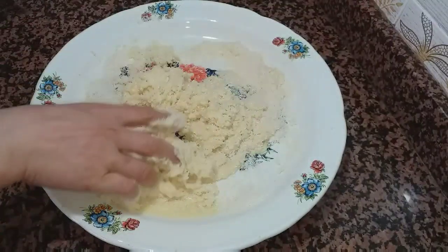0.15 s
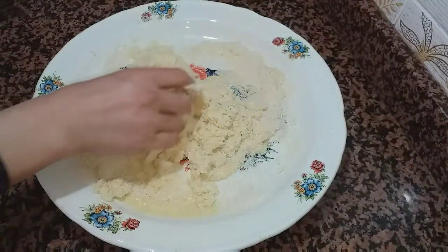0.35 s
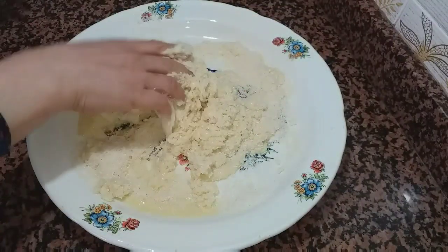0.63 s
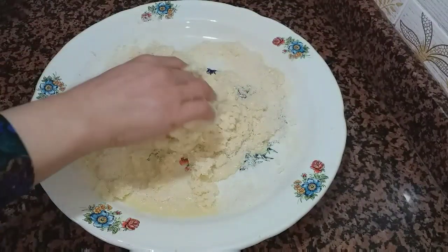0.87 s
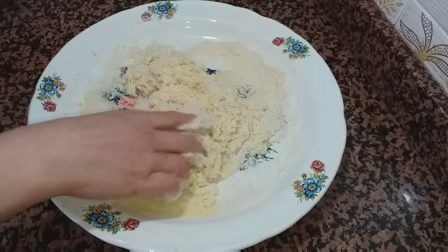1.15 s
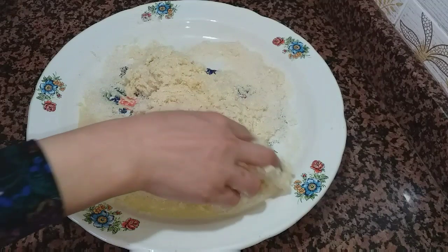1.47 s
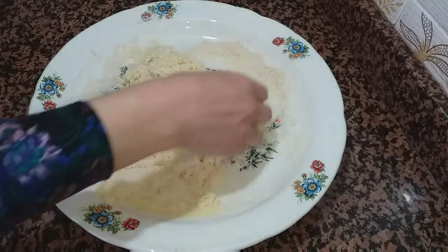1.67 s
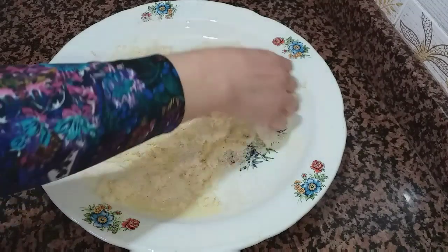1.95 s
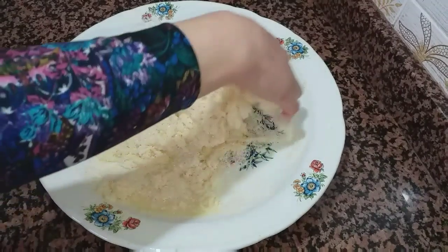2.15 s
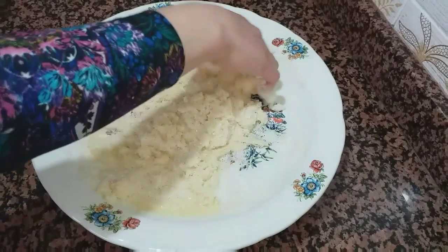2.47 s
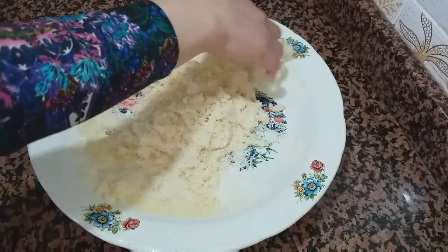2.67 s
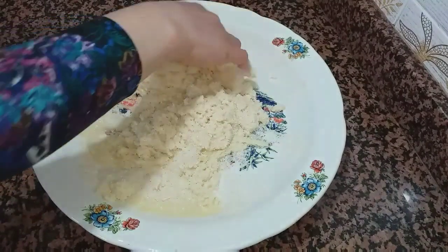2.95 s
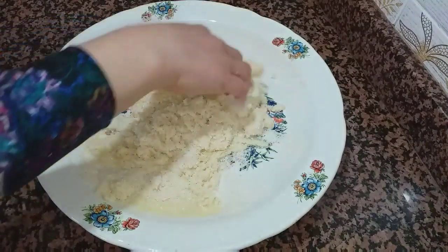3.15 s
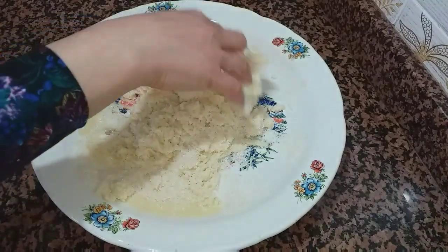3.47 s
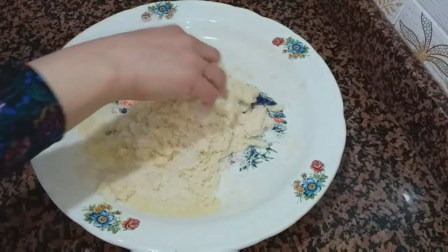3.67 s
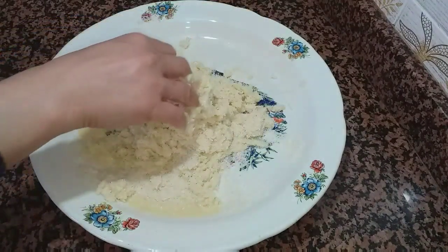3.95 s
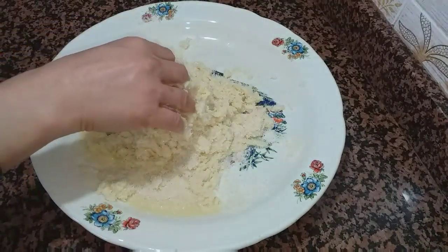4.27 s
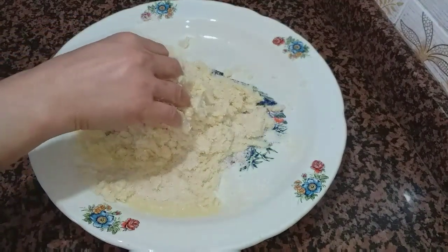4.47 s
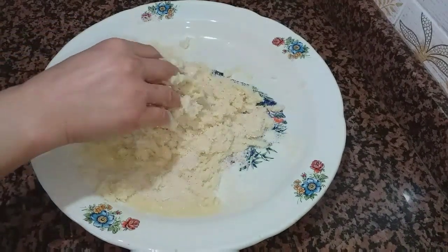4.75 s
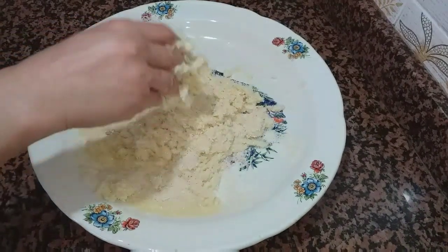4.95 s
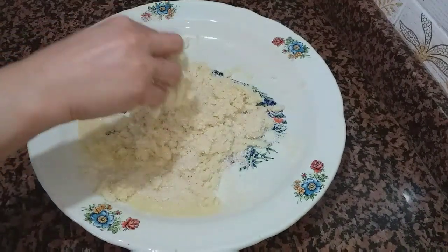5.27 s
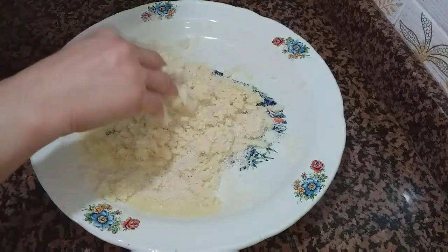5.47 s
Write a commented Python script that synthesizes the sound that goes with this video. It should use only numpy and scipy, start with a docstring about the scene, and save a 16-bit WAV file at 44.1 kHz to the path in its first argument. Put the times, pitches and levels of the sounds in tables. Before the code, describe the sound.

A hand rubs crumbly dough on a ceramic plate in soft hissing strokes, then two hard thumps knock the counter in a quiet kitchen.

```python
"""A hand rubs a crumbly mixture across a ceramic plate in slow strokes, in a quiet hard-walled kitchen.
Random crumb clicks make the hiss and ring the plate's resonances; low-ringing noise makes hollow swells.
Uneven slips make the plate drag on the counter, short pushes make it thump, and noise bursts make ticks.
Two faint creaks are pairs of sines. Noise following the stored sound energy makes the kitchen's echo.
A motor hums as wavering sines over the room's rumble of coloured noise."""
import sys
import numpy as np
from scipy import signal
from scipy.fft import rfft, irfft, next_fast_len
from scipy.io import wavfile
from scipy.ndimage import uniform_filter1d

SR = 44100
rng = np.random.default_rng(int(sys.argv[2]) if len(sys.argv) > 2 else 0)


def output_pcm(signal):
    """Save a mono or channel-first signal as 16-bit PCM at the path in sys.argv[1].

    Samples are clipped to [-1, 1] before scaling.
    """
    pcm = np.clip(np.atleast_2d(signal).T, -1, 1) * 32767
    wavfile.write(sys.argv[1], SR, np.round(pcm).astype(np.int16))


def field_ratio(decibels):
    """Amplitude ratio for a level in dB (20 dB per decade); scalars and array-likes work."""
    return 10 ** (np.asarray(decibels, dtype=float) / 20)


N = 247907   # length in samples

# Colour of the crumbs' broad hiss. Each row: frequency in Hz, relative level in dB per Hz.
CRUMB_HISS = [(3000, 3.5), (3600, 1.5), (5500, -1.5), (8200, -5), (9000, -19)]
# Colour of the finest, highest hiss. Each row: frequency in Hz, relative level in dB per Hz.
FINE_HISS = [(5060, -3), (8600, -6.5), (9840, -8.5), (11100, -6), (13400, -8), (16000, -14.5)]
# Resonances of the plate. Each row: frequency in Hz, width of one filter pass in Hz, relative level in dB.
PLATE = [(1495, 360, 3.5), (1852, 155, -3), (2117, 650, 9), (2717, 280, -2.5), (3340, 320, -7),
         (3800, 700, 0.5), (4140, 1800, 0), (5980, 190, -0.5), (7000, 100, -3), (8000, 420, 4.5)]
# Ways the counter can ring (its modes). Each row: frequency in Hz, relative level in dB,
# time to die away by 60 dB in seconds.
COUNTER = [(80.6, -3.5, 0.25), (100, -1.5, 0.58), (138.4, -2.5, 0.23), (179.1, 0, 0.25),
           (215.2, 6.5, 0.095), (301, 2, 0.11), (362, 6.5, 0.055), (421.5, 5.5, 0.04), (544.5, 4.5, 0.046),
           (672, -5.5, 0.12), (856, -9, 0.12), (960, -34, 0.11)]
# Shape of hollow swells and drags: dB under the top at the start, the same at the end,
# then slope in dB per second before the start and after the end.
SWELL = (13, 15.5, 240, 110)


def rms_one(x):
    """Scale to unit rms (average strength 1)."""
    return x / np.sqrt(np.mean(x ** 2) + 1e-20)


def at_hz(points, hz):
    """Read a table of (Hz, value) on a log-frequency axis."""
    table_hz, values = np.array(points)[:, 0], np.array(points)[:, 1]
    return np.interp(np.log(hz + 1), np.log(table_hz), values)


def coloured(x, spectrum):
    """Give x the spectrum, falling 60 dB per octave outside its ends; rms 1."""
    size = next_fast_len(len(x))
    hz = np.arange(size // 2 + 1) * SR / size
    octaves_below = np.maximum(np.log2(spectrum[0][0] / (hz + 1)), 0)
    octaves_above = np.maximum(np.log2((hz + 1) / spectrum[-1][0]), 0)
    gain = field_ratio(at_hz(spectrum, hz) - 60 * (octaves_below + octaves_above))
    return rms_one(irfft(rfft(x, size) * gain, size)[:len(x)])


def resonant(x, peaks):
    """Resonances side by side, each applied twice for dark valleys between them; rms 1."""
    out = 0
    for hz, width, level_db in peaks:
        r = np.exp(-np.pi * width / SR)   # share of the ringing kept per sample
        b = np.array([1, 0, -1]) * (1 - r * r) / 2
        a = [1, -2 * r * np.cos(2 * np.pi * hz / SR), r * r]
        once = signal.lfilter(b, a, x)
        out = out + field_ratio(level_db) * signal.lfilter(b, a, once)
    return rms_one(out)


def drift(rate):
    """Slow random wandering of rms 1: noise smoothed twice at the given rate in Hz."""
    r = np.exp(-2 * np.pi * rate / SR)
    noise = rng.standard_normal(N + SR)
    return rms_one(signal.lfilter([1], [1, -2 * r, r * r], noise)[SR:])   # skip the first second


def swells(rows, start_db, end_db, in_db_per_s, out_db_per_s, lag_s=0):
    """Level in dB of each (s, rise s, fall s): 0 on top, straight slopes to start and end, others beyond."""
    s, rise, fall = np.array(rows).T[:3, :, None]
    since = np.arange(N) / SR - s - lag_s
    early = since < 0
    length = np.maximum(np.where(early, rise, fall), .005)
    beyond = np.maximum(np.abs(since) - length, 0)
    drop_db = np.where(early, start_db, end_db) * np.minimum(np.abs(since) / length, 1)
    return -drop_db - np.where(early, in_db_per_s, out_db_per_s) * beyond


def grains(per_s, spread_db, clump_db):
    """Clicks of crumbs breaking at random moments, their sizes varied one by one and in clumps; rms 1."""
    born = rng.random(N) < per_s / SR
    single_db = spread_db * np.minimum(rng.exponential(1, N), 4)
    sizes = field_ratio(single_db + clump_db * drift(27))
    return rms_one(born * sizes * rng.choice([-1, 1], N))


def damped_rings(crumbs, peaks, wander_db):
    """The hand and the heap damp each resonance differently from moment to moment; rms 1."""
    out = 0
    for peak in peaks:
        level = field_ratio(peak[2] + wander_db * drift(2.03))
        out = out + level * resonant(crumbs, [peak])
    return rms_one(out)


def patchy(x, patchy_db, rate):
    """Broad overlapping bands swell and fade on their own as the crumbs under the hand change; rms 1."""
    size = next_fast_len(N)
    octaves = np.log2((np.arange(size // 2 + 1) + 1) * SR / size / 2400)   # above 2400 Hz
    out = 0
    for k in range(8):
        share = np.clip(1 - np.abs(3 * octaves - k), 0, 1)   # bands a third of an octave apart
        band = irfft(rfft(x, size) * share, size)[:N]
        out = out + field_ratio(patchy_db * drift(rate)) * band
    return rms_one(out)


def rubbing():
    """One stream of crumbs feeds the broad hiss, the finest top and the plate's rings."""
    # Strokes of the hand. Each row: hardest press in seconds, build-up in seconds, easing in seconds,
    # hiss level in dB, then over the hiss in dB: low plate rings, upper plate rings, finest top.
    strokes = [(0.0, .1, 0.13, -74.5, -7, -20, -1.5), (0.339, 0.14, 0.22, -61, -5.5, -9.5, -13.5),
               (.84, 0.12, 0.12, -63.5, -2.5, -11, -11), (1.18, .04, 0.11, -64.5, -9, -23, -11.5),
               (1.309, 0.095, .2, -61.5, -7, -10, -9), (1.61, 0.049, .15, -65.5, -6.5, -10, 1),
               (1.675, 0.033, 0.049, -54.5, -6, -10, -15), (1.95, 0.051, 0.1, -69.5, -8, -2, 1),
               (2.068, .07, 0.1, -60.5, -4, -6, -6), (2.36, 0.093, 0.17, -69.5, -6, -1, -0.5),
               (2.512, 0.082, 0.08, -57, -8.5, -11, -11.5), (2.94, 0.17, .17, -64, -9, -17, -5),
               (3.309, 0.13, 0.13, -64.5, -10.5, -21, -6.5), (3.722, 0.093, .14, -67, -11, -25, -2),
               (3.96, 0.036, 0.047, -77.5, -20, -24, -14), (4.371, 0.047, 0.076, -60.5, -8.5, -4.5, -8),
               (5.21, 0.067, 0.052, -65, -3, -14, 1), (5.3, 0.17, .35, -65.5, -2, -16, -18)]
    # Shape of a press: dB under its top at touch-down, the same at lift,
    # then slope in dB per second before touch-down and after lift.
    press_shape = (9.6, 10, 660, 164)
    ring_growth, ring_lag_s = 1.22, 0.012   # rings grow faster than the hiss, a little later
    hiss_db, low_db, upper_db, top_db = np.array(strokes).T[3:]
    press = field_ratio(swells(strokes, *press_shape))
    ringing = field_ratio(ring_growth * swells(strokes, *press_shape, ring_lag_s))
    crumbs = grains(per_s=12000.0, spread_db=0.0, clump_db=0.83)

    low_rings = field_ratio(hiss_db + low_db) @ ringing * damped_rings(crumbs, PLATE[:3], wander_db=1.5)
    upper_rings = field_ratio(hiss_db + upper_db) @ ringing * damped_rings(crumbs, PLATE[3:5], wander_db=3.0)
    hiss = coloured(crumbs, CRUMB_HISS) + field_ratio(-13.5) * resonant(crumbs, PLATE[5:])
    hiss = patchy(hiss, patchy_db=2.5, rate=9.4)
    fine_top = field_ratio(hiss_db + top_db) @ press * coloured(crumbs, FINE_HISS)
    return field_ratio(hiss_db) @ press * hiss + low_rings + upper_rings + fine_top


def hollow():
    """Hollow swells in mid stroke: noise in a few low resonances."""
    # Each row: top of the swell in seconds, rise in seconds, fall in seconds, level in dB.
    hollow_swells = [(2.076, 0.11, 0.15, -59), (3.07, 0.13, 0.35, -75)]
    # Each row: frequency in Hz, width of one filter pass in Hz, relative level in dB.
    hollow_ring = [(745, 180, -5), (941, 79, 0.5), (1080, 180, -6)]
    level = field_ratio(np.array(hollow_swells)[:, 3]) @ field_ratio(swells(hollow_swells, *SWELL))
    return level * resonant(rng.standard_normal(N), hollow_ring)


def bursts(rows, spectrum):
    """Noise bursts of (s, dB, t60 s) that swell quickly and die away by 60 dB in their t60."""
    envelope, t = np.zeros(N), np.arange(N) / SR
    for s, level_db, t60 in rows:
        since = np.maximum(t - s, 0)
        rise_s = min(0.02 * t60, 0.0053)   # a share of the t60, up to a longest rise
        envelope += field_ratio(level_db - 60 * since / t60) * (1 - np.exp(-since / rise_s))
    return envelope * coloured(rng.standard_normal(N), spectrum)


def snaps():
    """Crumbs snapping: single dry ticks of noise, each with a fine top."""
    # Each row: start in seconds, level in dB, time to die away by 60 dB in seconds,
    # finest top in dB over the level.
    ticks = [(.2645, -56, 0.0074, -12), (0.2784, -46, 0.0086, -11), (4.367, -49, 0.011, -10),
             (4.766, -55.5, 0.14, -12), (5.11, -62, .2, 3), (5.158, -72.5, .015, -1),
             (5.19, -52, 0.046, 4.5)]
    broad = bursts([row[:3] for row in ticks], CRUMB_HISS)
    fine = bursts([(s, level_db + top_db, t60) for s, level_db, t60, top_db in ticks], FINE_HISS)
    return broad + fine


def near(hz, centre_hz, fall_db):
    """Gain that falls in dB with the square of the distance in octaves from a centre."""
    return field_ratio(-fall_db * np.log2(hz / np.maximum(centre_hz, 40)) ** 2)


def counter(forces):
    """Each mode of the counter rings from its own force signal."""
    out = 0
    for force, (hz, level_db, t60) in zip(forces, COUNTER):
        r = field_ratio(-60 / (max(t60, .01) * SR))   # share of the ringing kept per sample
        w = 2 * np.pi * hz / SR
        ring = signal.lfilter([0, np.sin(w)], [1, -2 * r * np.cos(w), r * r], force + 1e-18)
        out = out + field_ratio(level_db) * ring
    return out


def thumps():
    """A short push drives the modes near the blow's pitch centre; a noisy crack comes first."""
    # Blows on the counter. Each row: start in seconds, thud push in dB, pitch centre in Hz,
    # fall from that centre in dB per octave squared, crack level in dB,
    # time for the crack to die away by 60 dB in seconds.
    blows = [(2.955, -50, 91, 5.5, -85, 0.027), (3.784, -47, 310, 16, -55, 0.13),
             (3.811, -53.5, 294, 1.5, -70, 0.048), (4.4568, -42, 303, 13, -38, 0.49),
             (4.4649, -24.5, 292, 7, -15.5, 0.032), (4.5199, -33, 227, -2, -36, 0.063),
             (4.8077, -19.5, 400, 13, -23, 0.03), (4.825, -30.5, 100, 7, -34.5, 0.019),
             (4.8824, -41, 500, 0.4, -35, 0.026)]
    # Colour of the crack. Each row: frequency in Hz, relative level in dB per Hz.
    crack_colour = [(530, -4.5), (900, -12.5), (1130, -14.5), (2090, -9.5), (2860, -15), (3960, -8),
                    (4360, -9), (7580, -14.5), (8050, -16.5), (9770, -25), (16000, -31)]
    forces = np.zeros((len(COUNTER), N))
    push = np.hanning(40)
    push = push / push.sum()
    for k, (hz, _, _) in enumerate(COUNTER):
        lag = .008 / np.sqrt(hz)   # seconds: bending waves carry the bass more slowly
        for s, thud_db, centre_hz, fall_db, *_ in blows:
            at = round((s + lag) * SR)
            strength = (-1) ** k * field_ratio(thud_db) * near(hz, centre_hz, fall_db)
            forces[k, at:at + len(push)] += strength * push
    cracks = bursts([(row[0], *row[4:]) for row in blows], crack_colour)
    return counter(forces) + cracks


def drag():
    """Uneven slips of the plate's foot shake the counter's modes around the pitch centre."""
    # The plate shifts and drags on the counter. Each row: top of the swell in seconds, rise in seconds,
    # fall in seconds, rumble level in dB, pitch centre in Hz.
    drags = [(2.964, 0.017, 0.15, -52, 130), (3.7, .06, 0.051, -55, 172), (3.796, 0.01, 0.057, -51, 230),
             (3.97, 0.053, 0.079, -60.5, 185), (4.421, 0.17, 0.064, -51.5, 240),
             (5.23, 0.33, 0.13, -61, 190)]
    shapes = field_ratio(np.array(drags)[:, 3:4] + swells(drags, *SWELL)) + 1e-12
    level = shapes.sum(axis=0)
    centre_hz = np.array(drags)[:, 4] @ shapes / level   # the louder drag pulls the pitch to itself
    slips = grains(per_s=1800.0, spread_db=1.0, clump_db=-1.5)
    shaken = counter([slips * near(hz, centre_hz, fall_db=3.5) for hz, _, _ in COUNTER])
    loudness = np.sqrt(uniform_filter1d(shaken ** 2, size=4000) + 1e-12)
    return level * shaken / loudness   # even out the shaking, then set its level


def creaks():
    """Brief faint creaks: a tone and its octave under a smooth swell."""
    # Each row: start in seconds, length in seconds, frequency of the lower tone in Hz, its peak in dB.
    creak_rows = [(5.207, 0.07, 370, -60), (5.311, 0.033, 379, -64)]
    out = np.zeros(N)
    for s, length, hz, level_db in creak_rows:
        at, swell = round(s * SR), np.hanning(int(length * SR))
        phase = 2 * np.pi * hz * np.arange(len(swell)) / SR
        tones = np.sin(phase) + 0.52 * np.sin(2 * phase)
        out[at:at + len(swell)] += field_ratio(level_db) * swell * tones
    return out


def kitchen(x):
    """Echo: each half-octave band stores the energy it gets, loses it at its own rate, sounds as noise."""
    # How long the room rings. Each row: frequency in Hz, time to die away by 60 dB in seconds.
    kitchen_t60 = [(80, 0.61), (300, 0.5), (1000, 0.59), (4000, 0.61), (8000, 0.48), (15000, 0.14)]
    out, edges = 0, 45 * 2 ** np.arange(0, 8.6, .5)   # band edges in Hz
    white = rng.standard_normal((2, N))   # neighbouring bands use different noise
    arrive = np.exp(-1 / (0.00057 * SR))   # reflections take a moment to build up
    for k, (low, high) in enumerate(zip(edges, edges[1:])):
        band = signal.butter(2, [low, high], "band", fs=SR, output="sos")
        t60 = at_hz(kitchen_t60, np.sqrt(low * high))
        keep = field_ratio(-120 / (t60 * SR))   # share of the energy kept per sample
        received = signal.sosfilt(band, x + 1e-9) ** 2
        energy = signal.lfilter([1 - keep], [1, -keep], received)
        energy = signal.lfilter([1 - arrive], [1, -arrive], energy)
        out = out + np.sqrt(energy) * rms_one(signal.sosfilt(band, white[k % 2]))
    return out


def room_tone():
    """Rumble and hiss of coloured noise, with motor tones whose level and pitch waver a little."""
    # Colour of the room's noise. Each row: frequency in Hz, relative level in dB per Hz.
    room_colour = [(36, -37), (62, 1.5), (150, -1), (223, -8.5), (294, -3), (417, -10.5), (538, -6.5),
                   (604, -11), (1680, -24), (3700, -22.5), (7610, -26.5), (9160, -30.5), (14900, -29.5),
                   (16000, -75)]
    # Tones of the motor. Each row: frequency in Hz, middle level in dB rms.
    motor_tones = [(48.4, -74.5), (96.9, -81), (145.3, -76.5), (269.2, -83), (301.5, -80), (538.3, -80)]
    t = np.arange(N) / SR
    hum = 0
    for hz, level_db in motor_tones:
        level = np.sqrt(2) * field_ratio(level_db + 0.78 * drift(5.4))   # root 2 turns rms into peak
        turns = hz * t + rng.random() + 0.17 * drift(0.75)
        hum = hum + level * np.sin(2 * np.pi * turns)
    return field_ratio(-69.5) * coloured(rng.standard_normal(N), room_colour) + hum


def scene():
    """Blows and ticks fill the kitchen and keep the plate singing; the rubbing is near and soft."""
    hits = thumps() + snaps()
    tail = kitchen(hits)
    singing = field_ratio(-69.5) * resonant(tail, PLATE[5:7])
    on_plate = rubbing() + hollow()
    mix = hits + field_ratio(-8) * tail + singing + on_plate + drag() + creaks() + room_tone()
    return mix[None]   # one channel


def band_limit(x):
    """A steep low-pass at the top of the band."""
    return signal.sosfilt(signal.butter(12, 16500, fs=SR, output="sos"), x)


def record(dry):
    """The microphone loses the deepest bass, below 42 Hz."""
    bass_cut = signal.butter(4, 42, "high", fs=SR, output="sos")
    return band_limit(signal.sosfilt(bass_cut, dry))


dry = scene()
out = record(dry)
output_pcm(out)
```